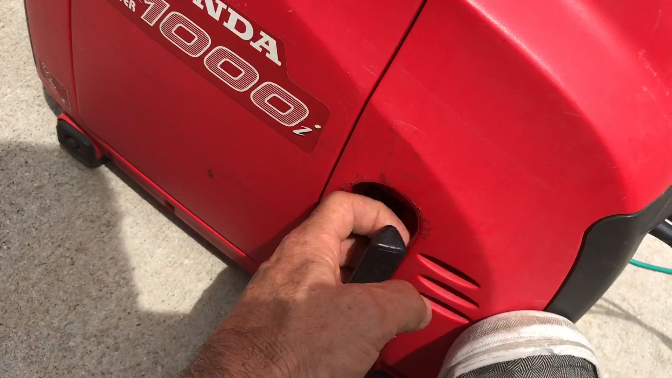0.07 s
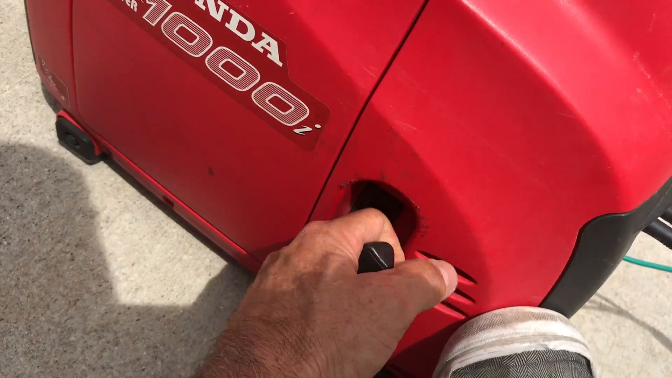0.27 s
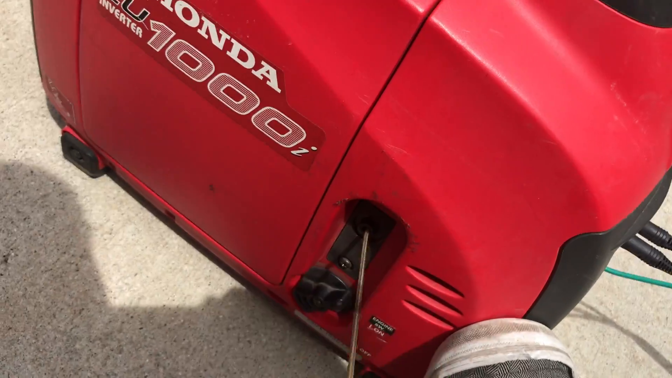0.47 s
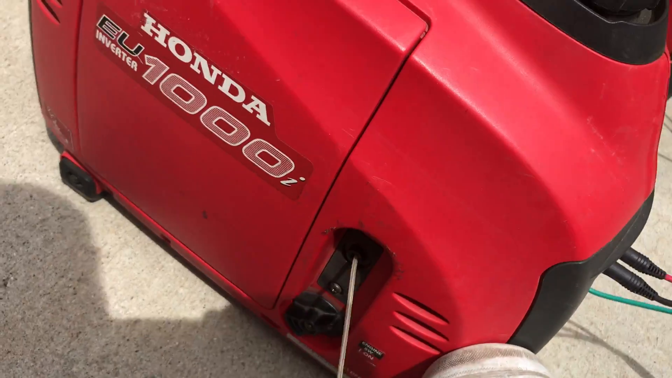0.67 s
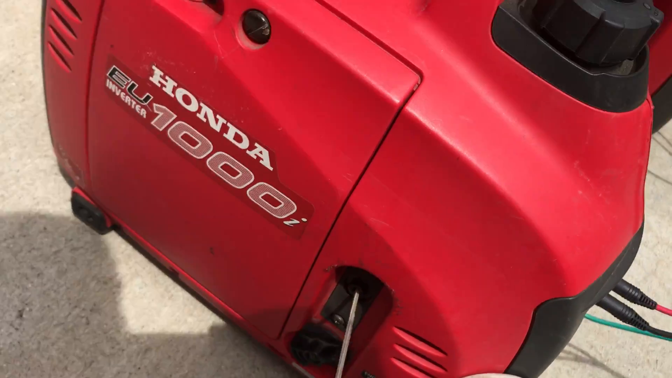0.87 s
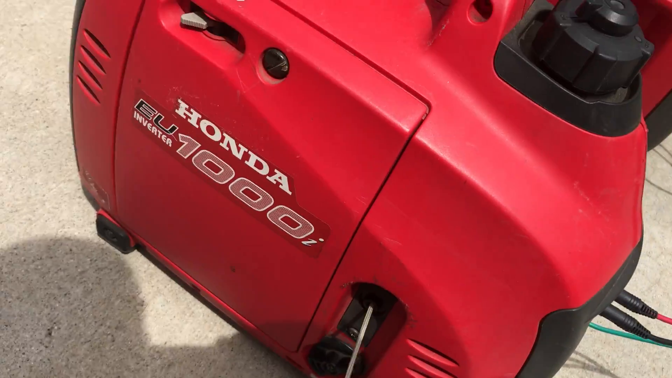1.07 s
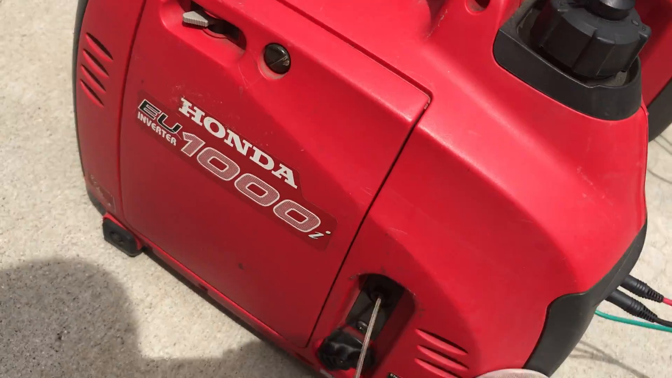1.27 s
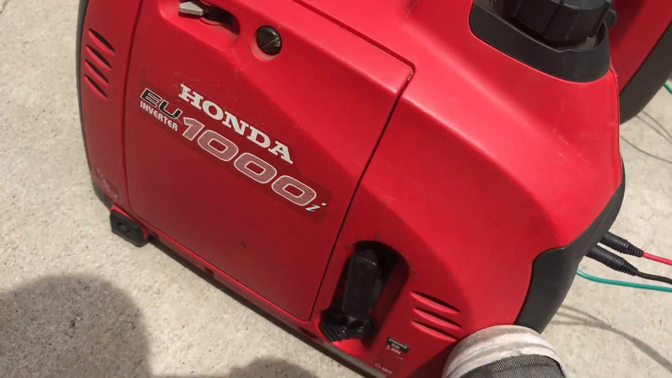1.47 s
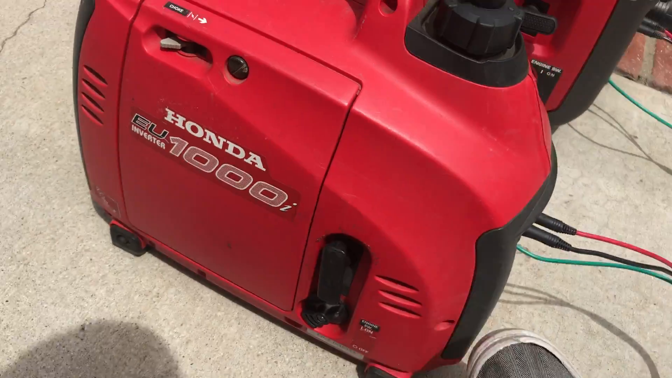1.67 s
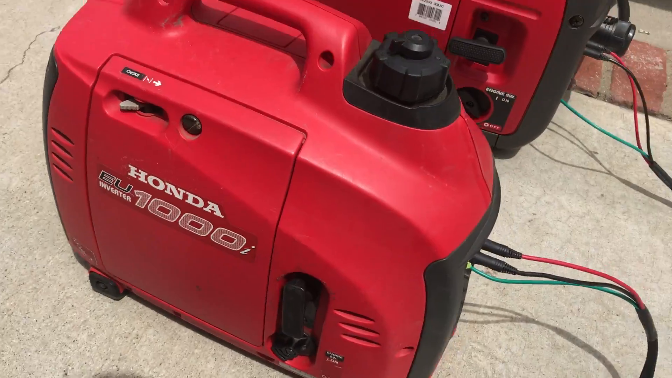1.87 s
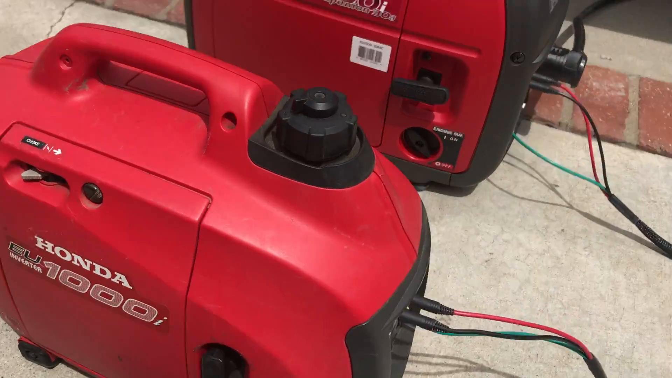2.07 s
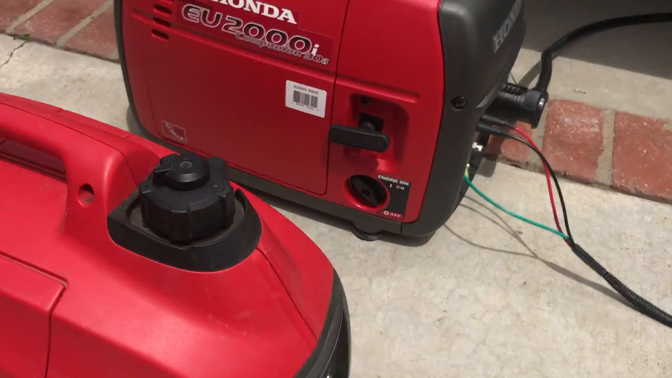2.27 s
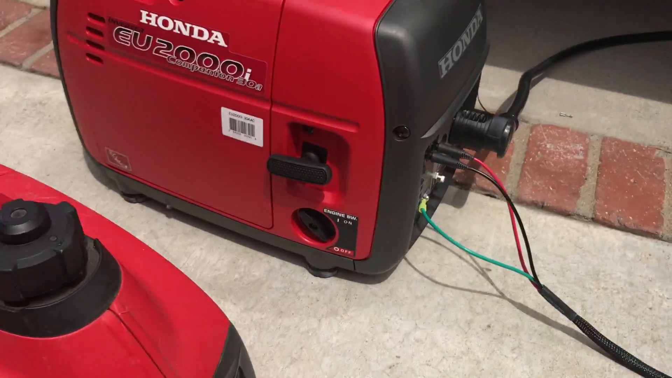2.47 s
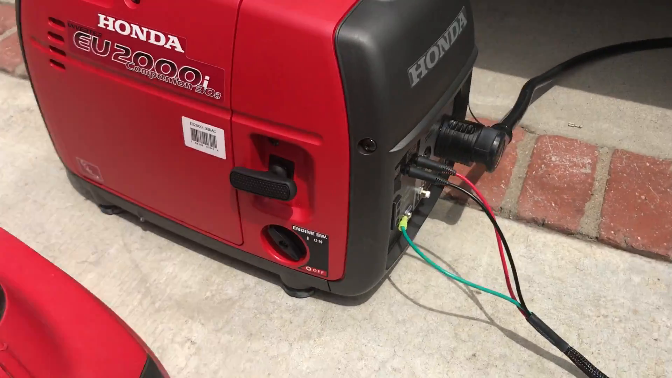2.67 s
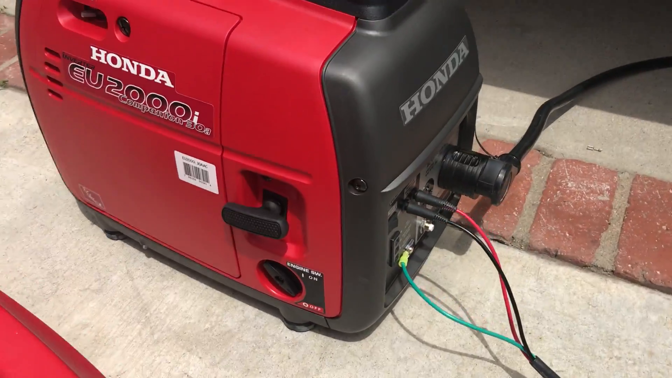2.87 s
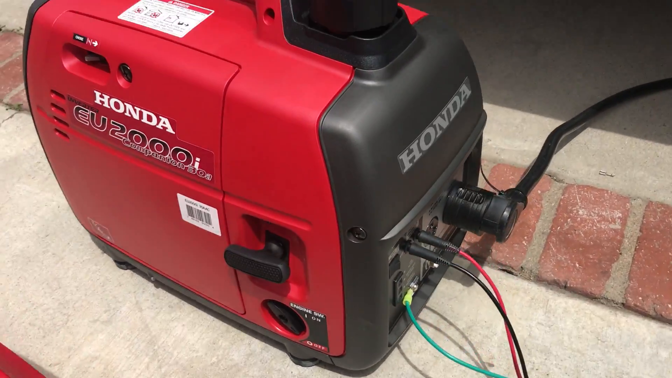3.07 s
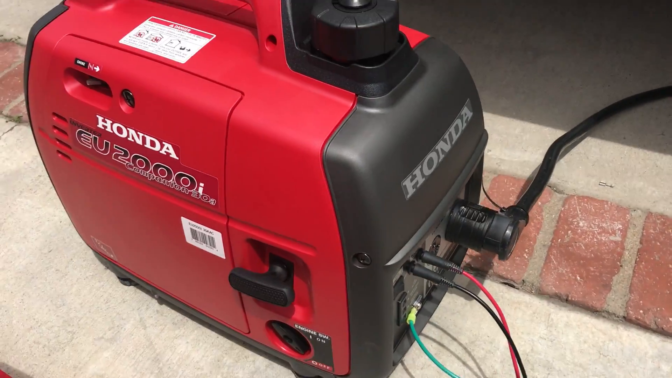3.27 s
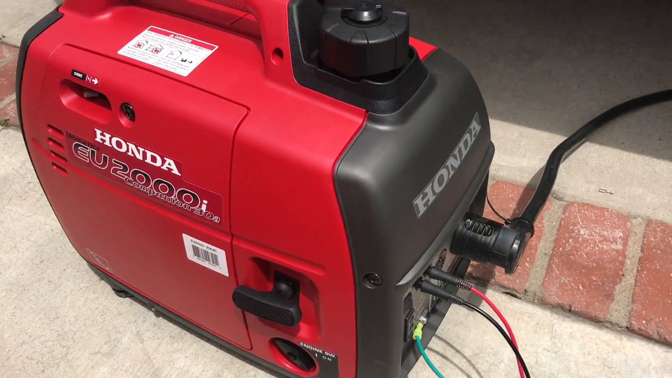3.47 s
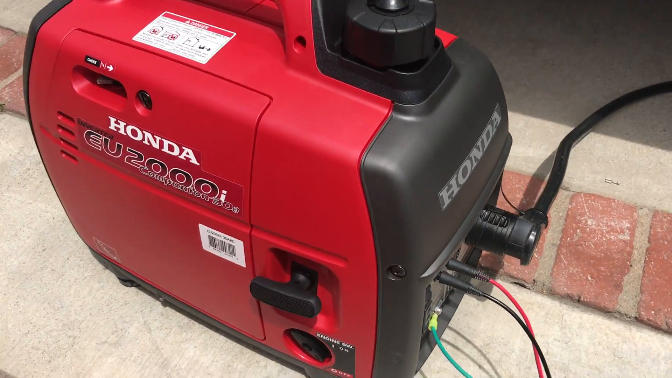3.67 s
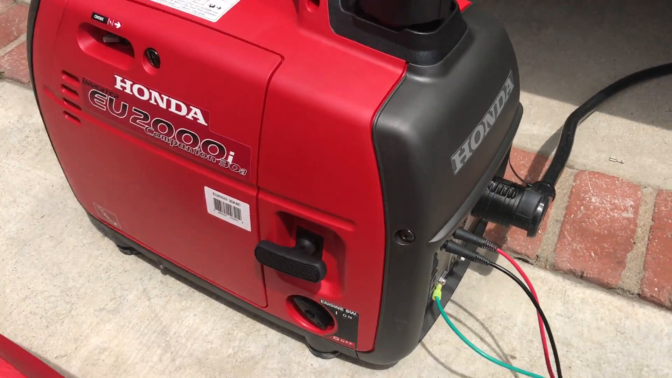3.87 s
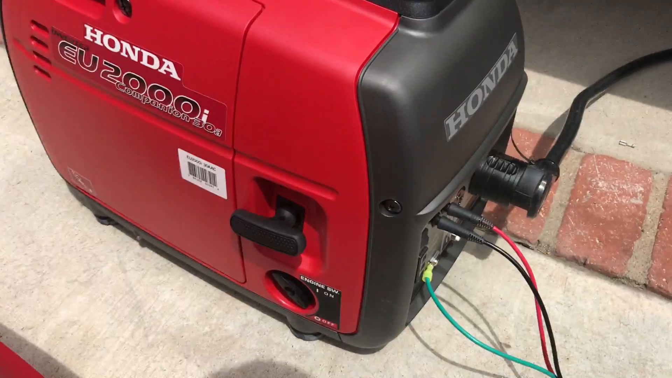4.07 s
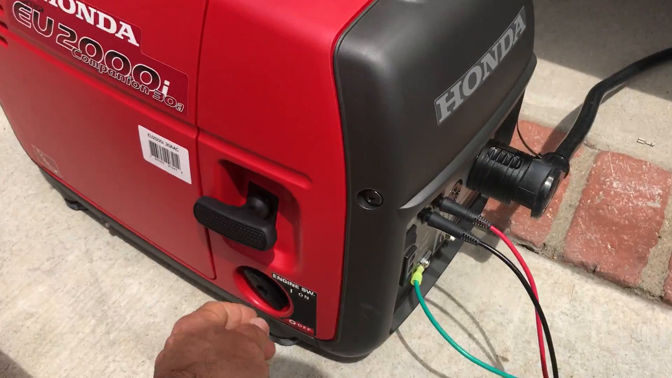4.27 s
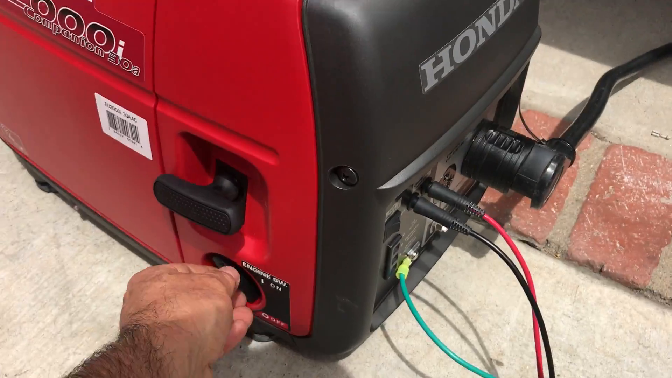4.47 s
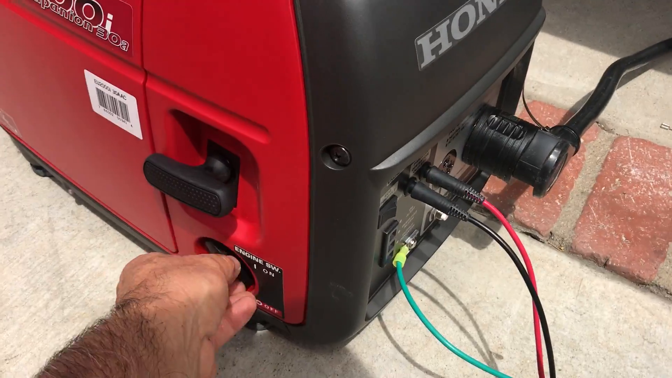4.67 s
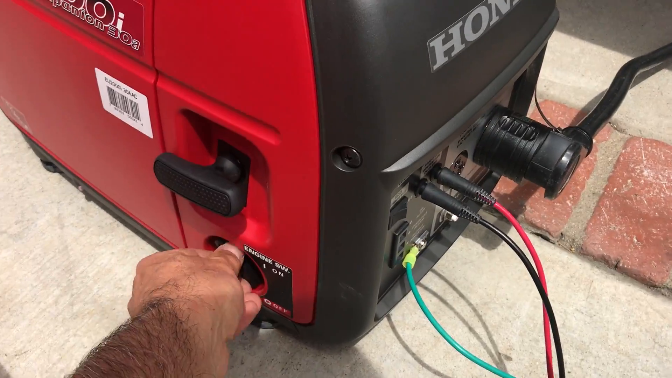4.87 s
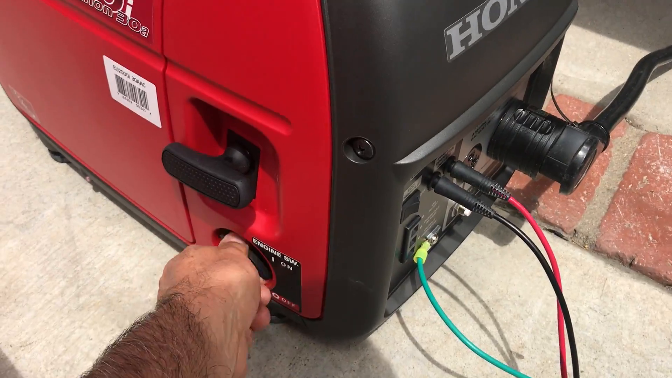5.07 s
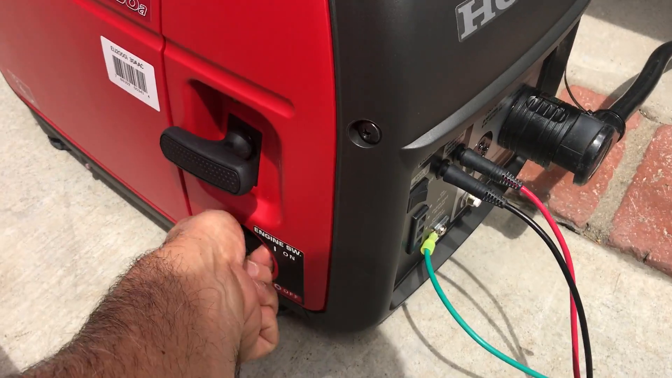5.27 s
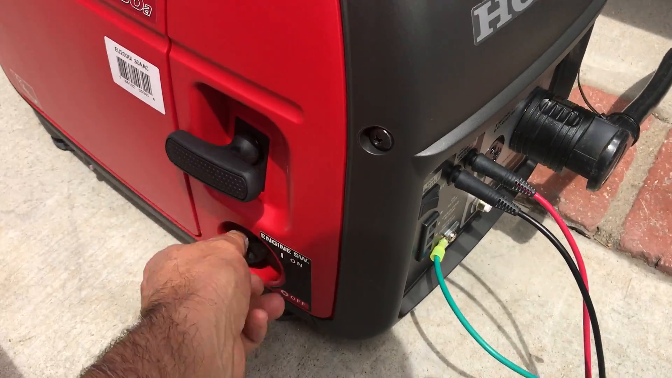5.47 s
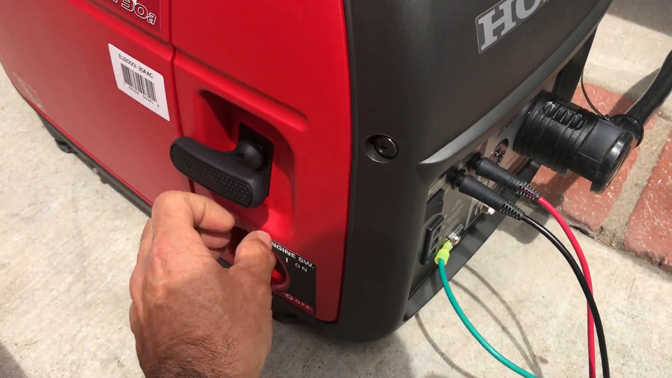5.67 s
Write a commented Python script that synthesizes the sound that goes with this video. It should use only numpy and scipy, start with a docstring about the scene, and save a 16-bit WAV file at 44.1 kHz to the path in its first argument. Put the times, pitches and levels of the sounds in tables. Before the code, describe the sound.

A small petrol generator is pull-started with a rope zip and a plastic slap, then settles into a steady, rattling drone.

```python
"""A concrete yard, where a small petrol inverter generator is pull-started close by.
The grip clicks, the reel scrapes, the rope zips out, the single four-stroke cylinder catches and the
grip slaps back on the plastic case. The engine overshoots, then settles to a governed exhaust drone
with knocking panels, valve clatter and a fan whine, over a low breeze and a faint outdoor hiss."""
import sys
import numpy as np
from scipy import signal
from scipy.fft import rfft, irfft
from scipy.io import wavfile

SR = 44100
rng = np.random.default_rng(int(sys.argv[2]) if len(sys.argv) > 2 else 0)


def inscribe(sig):
    """Save sig as 16-bit PCM at rate SR to the path in sys.argv[1].

    A 1-D sig is mono; a 2-D sig holds one channel per row.
    Samples are clipped to [-1, 1] before scaling.
    """
    pcm = np.round(np.clip(np.atleast_2d(sig).T, -1, 1) * 32767)
    wavfile.write(sys.argv[1], SR, pcm.astype(np.int16))


N = 252252
T = np.arange(N) / SR

# the rope is drawn, the engine catches, the throttle starts to close, the running settles
PULL_S, CATCH_S, GOVERN_S, SETTLE_S = 0.49, 0.959, 1.36, 1.95
RUNNING_HZ = 33.36  # governed engine cycles a second, two shaft turns each

# harmonics of the engine cycle, 12 for the exhaust, the rest for the case: order, relative_db
DRONE = [(1, -28), (2, -6), (3, -4), (4, 2), (5, -12), (6, -2), (7, -1), (8, -10.5), (9, -9.5), (10, -10.5),
         (11, -9), (12, -17), (13, -18.5), (14, -19), (15, -15), (16, -45.5), (17, -8.5), (18, -12.5),
         (19, -11.5), (20, -21), (21, -11.5), (22, -6), (23, -45.5), (24, -32), (25, -5), (26, -10.5),
         (27, -6.5), (28, -15), (29, -10), (30, -17.5), (31, -8), (32, -8), (33, -11.5), (34, -29.5),
         (35, -18), (36, -0.5), (37, -15.5), (38, -27), (39, -27), (40, -11)]
# resonances of the plastic panels: frequency_hz, relative_db
PANEL_COLOUR = [(240, -43.5), (400, -6), (436, -10.5), (580, -3), (662, -2), (717, -5), (776, -2),
                (916, -7), (1380, 0), (1650, -8.5), (1950, -17.5), (2540, -39), (4290, -120)]
# resonances of the metal cylinder head: frequency_hz, relative_db
HEAD_COLOUR = [(1750, -12), (1950, -11.5), (2040, -5), (2120, -4.5), (2290, 0.5), (2460, 4), (2540, -5),
               (2750, -11.5), (3050, -21), (3400, -22.5), (3800, -30.5)]


def engine():
    """One crankshaft keeps all the engine's voices in step."""
    cycle = np.cumsum(speed()) / SR
    # slow cranking mostly rustles; the parts knock as speed builds
    knocking = np.interp(T, [1.35, 1.7], [.15, .9])
    return (exhaust(cycle) + first_firings(cycle) + throb(cycle) + panels_and_head(cycle, knocking)
            + valves(cycle) + fan(cycle) + knocking * alternator(cycle))


def exhaust(cycle):
    """Muffled firings: ragged puffs of gas, joined by a clean low drone once the engine catches."""
    # boom of the muffler: frequency_hz, relative_db
    boom = [(60, -3), (110, -3.5), (170, -2.5), (240, -1.5), (330, -7), (420, -26.5)]
    puffs = unit(colour(noise() * (1 + 0.41 * np.cos(2 * np.pi * cycle)), boom))
    puffs *= drive_gain(-37.5, doubling_db=7, open_db=12.5, lean_db=2)
    drone = ramp(CATCH_S, .2) * hum(cycle, DRONE[:12], wander_db=2.5)
    drone *= drive_gain(-32.5, doubling_db=-1, open_db=7, lean_db=2.6)
    unsettled = 1 - ramp(SETTLE_S, 0.44)
    return undb(-5 * unsettled) * drone + puffs


def first_firings(cycle):
    """On open throttle every cycle bangs, harder with speed, ringing the head and, less, the panels."""
    # stray hard firings as the throttle closes: start_s, level_db
    stray_firings = [(1.444, -18.5), (1.589, -25), (1.726, -28.5)]
    times = np.interp(np.arange(int(cycle[-1])) + .45, cycle, T)  # fires 45% into the cycle
    times = times[(times > CATCH_S) & (times < GOVERN_S + .015)]
    levels_db = -17 + 3.5 * np.log2(np.interp(times, T, speed()) / RUNNING_HZ)
    bangs, attack = np.zeros(N), 1 - fade(.012)
    for start_s, level_db in stray_firings + list(zip(times, levels_db)):
        add(bangs, start_s, undb(level_db) * attack * burst(0.058))
    return undb(2) * colour(bangs, HEAD_COLOUR) + undb(-1.5) * colour(bangs, PANEL_COLOUR)


def throb(cycle):
    """Until it settles, the piston shakes the case at shaft rate and double, sweeping through its boom."""
    boom_hz, out = 79.6, 0
    for order, base_db, open_db in [(2, -35, 10.5), (4, -45.5, 20.5)]:
        off_boom_db = -9 * np.log2(order * speed() / boom_hz) ** 2
        gain = undb(base_db + open_db * throttle() + off_boom_db)
        out += gain * np.sqrt(2) * np.sin(2 * np.pi * order * cycle)
    return out * ramp(CATCH_S, 0.51) * (1 - ramp(SETTLE_S + 0.23, 0.31)) * coast()


def panels_and_head(cycle, knocking):
    """Knocks rattle the plastic panels loosely and the metal head tightly; high orders buzz the case."""
    rustle = np.sqrt(1 - knocking ** 2)
    loose = clatter(cycle, t60=0.026, slop_s=0.00025, scatter_db=2.5)
    loose = colour(loose, [(450, -7.5), (900, -2.5), (1150, -1.5), (2000, 1.0)])
    panels = knocking * unit(colour(loose, PANEL_COLOUR)) + rustle * unit(colour(noise(), PANEL_COLOUR))
    panels += undb(-2) * knocking * hum(cycle, DRONE[12:], wander_db=1.5)
    panels *= drive_gain(-34.5, doubling_db=5.5, open_db=4, lean_db=0.5)
    tight = clatter(cycle, t60=0.019, slop_s=.00004, scatter_db=1.83)
    head = knocking * unit(colour(tight, HEAD_COLOUR)) + rustle * unit(colour(noise(), HEAD_COLOUR))
    head *= drive_gain(-34.5, doubling_db=4.5, open_db=1.5, lean_db=1.15)
    return panels + head


def clatter(cycle, t60, slop_s, scatter_db):
    """Each knock returns at its own crank angle with its own ring, never quite alike."""
    # valve gear and piston knocks: cycle_fraction, relative_db
    knocks = [(.07, -7), (0.199, -3), (0.349, -2), (0.461, -9.5), (0.602, -14), (.66, -6), (.77, -1),
              (0.878, -2.5), (0.969, -6.5)]
    out, cycles = np.zeros(N), np.arange(int(cycle[-1]) + 1)
    for fraction, level_db in knocks:
        timing, force = rng.standard_normal((2, len(cycles)))
        times = np.interp(cycles + fraction, cycle, T) + slop_s * timing
        gains = undb(level_db + scatter_db * force) * (cycles + fraction < cycle[-1])
        blows = np.bincount(np.maximum(times * SR, 0).astype(int), gains, N)[:N]
        out += signal.fftconvolve(blows, burst(t60))[:N]
    return unit(out)


def fan(cycle):
    """A shaft-locked whine and air howling in the vents; both swell as the listener drifts past."""
    angle = 2 * np.pi * cycle
    flow = (speed() / RUNNING_HZ) ** 3 * coast()
    whine = undb(-32.5 + 2.5 * walk(15)) * np.sin(42 * angle + .25 * walk(12))
    whine *= 1 + .6 * np.sin(angle)  # pulses once a cycle
    air = clatter(cycle, t60=0.027, slop_s=.0001, scatter_db=-0.5) + undb(-7.5) * noise()
    howl = undb(-35) * unit(colour(air, [(1100, -24), (1235, -0.5), (1320, 1), (1480, -15.5)]))
    # air rushing from the vents: frequency_hz, relative_db
    rush_colour = [(2400, -7.5), (2650, 5), (3050, -3.5), (3500, -12.5)]
    rush = undb(-45.5) * unit(colour(air + noise(), rush_colour))
    pass_s, whine_reach_s, vent_reach_s = 2.61, 1.08, 0.38
    whine_distance = np.hypot(1, (T - pass_s) / whine_reach_s)
    vent_distance = np.hypot(1, (T - pass_s) / vent_reach_s)
    return flow * (whine / whine_distance + (howl + rush) / vent_distance)


def alternator(cycle):
    """The alternator whines thinly on high multiples of the engine cycle."""
    # partials of the whine: order, relative_db
    partials = [(61, -2.5), (68, 3.5), (73, -2.5), (102, -24.5), (129, -25), (144, -24), (163, -35.5)]
    gain = drive_gain(-39.5, doubling_db=7.5, open_db=-4, lean_db=4.5)
    return gain * hum(cycle, partials, wander_db=3.5)


def valves(cycle):
    """Gas hisses past the valve as it lifts, once a cycle; the cam drive whirrs and the gear rings."""
    # hiss at the valve: frequency_hz, relative_db
    gas_colour = [(1940, -34), (3300, 4.5), (3970, -14), (4270, 2), (4900, -1.5), (5100, -2.5),
                  (5560, -1.5), (6020, -8), (6870, -13.5), (7540, -16), (8380, -13), (10600, -27),
                  (13600, -23.5), (16000, -38.5)]
    since_lift = (cycle - .58) % 1
    lift = .32 + (1 - np.exp(-since_lift / .04)) * np.exp(-since_lift / .36)
    ticks = np.interp(T, [1, 1.6], [.3, 1]) * clatter(cycle, t60=.06, slop_s=.000006, scatter_db=1)
    spurts = unit(lift * (noise() + undb(-4) * ticks))
    whirr = undb(-4) * unit(colour(ticks, [(3400, 2.0), (4300, 5), (5400, -2.0), (5900, -16.0)]))
    ring = undb(-21) * unit(colour(spurts, [(7800, -31.5), (8230, 12.5), (8370, -5), (8800, -23.5)]))
    gas = unit(colour(spurts, gas_colour))
    gas = colour(gas, [(3000, -5.0), (6300, -2.5), (8500, 0.0), (16000, -0.5)])
    return drive_gain(-56.5, doubling_db=10.5, open_db=6.5, lean_db=0.6) * (gas + whirr + ring)


def speed():
    """Engine cycles a second: the run-up, then the governor's slow hunting."""
    # the pull, the catch and the overshoot, last speed held: time_s, cycle_hz
    run_up = [(.55, 4), (.75, 11), (1.0, 15), (1.1, 19.5), (1.2, 26), (1.3, 31.24), (1.55, 35.01),
              (1.8, 36.9), (2.13, 33.36)]
    times, cycle_hz = np.transpose(run_up)
    depth_hz, period_s, peak_s = .17, 1.07, 3.26
    hunting = depth_hz * np.cos(2 * np.pi * (T - peak_s) / period_s)
    return np.interp(T, times, cycle_hz) + hunting * (T > times[-1])


def throttle():
    """Wide open (1) for the start, then closing to its running position (0)."""
    return np.exp(-np.maximum(T - GOVERN_S, 0) / 0.18)


def coast():
    """A dip in gain as the engine coasts for a moment in the overshoot."""
    return undb(-6.5 * bump(1.65, 0.068))


def drive_gain(running_db, doubling_db, open_db, lean_db):
    """A part's gain follows doublings of speed, the open throttle and the listener leaning in late on."""
    load_db = doubling_db * np.log2(speed() / RUNNING_HZ) + open_db * throttle()
    at_rest_db = -30 * (1 - ramp(PULL_S - .05, 0.3))
    heave_db = 1.5 * bump(0.633, 0.02)  # the piston's first compression
    return undb(running_db + load_db + at_rest_db + heave_db + lean_db * ramp(4.51, 0.16)) * coast()


def grip():
    """Each blow of the starter grip rings the case modes and the dense shell, with a crack on top."""
    # grip and rope knocking on the case: start_s, level_db, crack_relative_db
    blows = [(.119, -27, -42), (0.274, -39.5, -9), (0.28, -26, -17), (.284, -25.5, -18), (.997, -27.5, -2),
             (1.028, -27.5, -0.5), (1.478, -7.5, -21), (1.484, -12.5, -26), (1.4919, -6.5, -10.5),
             (1.5, -7.5, -21), (1.5097, -11.5, -26), (1.514, -20, -7), (1.533, -18, -13)]
    # modes of the plastic case: pitch_hz, relative_db, ring_time_ratio
    case_modes = [(187.6, -15.5, 5.9), (264, -4, 0.65), (360, -17, 0.66), (633, -5, 0.48),
                  (910, -0.5, 0.31), (957, -5, 1.3), (1263, 3, 0.34), (1375, 0.5, 1.05), (1506, -0.5, 1.1),
                  (1590, -3.5, 0.61), (2104, -1, 0.54), (2295, -5, 0.64), (2550, -28, 0.43),
                  (3260, -15.5, 0.93)]
    ring_s, even_blow_db = 0.051, -11.5
    modes, shell, crack = np.zeros((3, N))
    for start_s, level_db, crack_db in blows:
        # hard blows ring brighter; the fingers cushion gentle ones into a slower attack
        tilt_db = 0.57 * (level_db - even_blow_db)
        attack = 1 - fade(.0018 * 2 ** ((even_blow_db - level_db) / 6))
        for pitch_hz, mode_db, ring_ratio in case_modes:
            polarity, detune = rng.choice([-1, 1]), 1 + 0.005 * rng.standard_normal()
            gain = undb(level_db + mode_db + tilt_db * np.log2(max(pitch_hz, 700) / 1300))
            tone = polarity * np.sin(2 * np.pi * pitch_hz * detune * T[:N // 20])
            add(modes, start_s, gain * attack * fade(ring_s * ring_ratio) * tone)
        add(shell, start_s, undb(level_db) * attack * burst(ring_s))
        add(crack, start_s, undb(level_db + crack_db) * attack * burst(0.039))
    shell = colour(shell, [(700, -11), (1300, 11.0), (1800, -12), (2400, 9.5), (3600, -22.0),
                           (6000, -29.5), (15000, -71)])
    crack = colour(crack, [(2000, 17.5), (5000, 1.5), (9000, -10.0), (16000, -20)])
    return undb(-5.5) * modes + undb(-1.5) * shell + crack


def rope():
    """The braid ticks over its guide so fast that it sings raspily; each zip curves up in pitch."""
    # zips of the rope: start_s, length_s, first_hz, last_hz, level_db
    zips = [(0.72, 0.19, 1390, 2123, -36), (0.889, 0.09, 965, 1037, -32.5), (0.958, 0.1, 1290, 1410, -28.5)]
    out, edge_s = np.zeros(N), 0.0083
    for start_s, length_s, first_hz, last_hz, level_db in zips:
        pitch_hz = first_hz + (last_hz - first_hz) * np.clip((T - start_s) / length_s, 0, 1) ** 1.7
        envelope = np.clip(np.minimum(T - start_s, start_s + length_s - T) / edge_s, 0, 1)
        angle = 2 * np.pi * np.cumsum(pitch_hz * (1 + 0.043 * walk(250))) / SR
        overtone = undb(-14) * np.interp(pitch_hz, [1500, 1800], [1, .1])  # the case muffles it above 3 kHz
        out += envelope * undb(level_db + 3.1 * walk(90)) * (np.sin(angle) + overtone * np.sin(2 * angle))
    return out


def reel():
    """The starter reel scrapes in fits, harder through the pull, and fades out after the catch."""
    # scrape of the reel: frequency_hz, relative_db
    scrape_colour = [(2150, -5), (2500, 4.5), (2950, 3), (3300, -13.5), (4500, -16), (6000, -26.5),
                     (10000, -35)]
    pull = np.clip((T - PULL_S) / (CATCH_S - PULL_S), 0, 1)
    gain = undb(-60 + 21 * pull + 4.5 * walk(12)) * (1 - ramp(CATCH_S + 0.33, 0.31))
    return gain * unit(colour(noise(), scrape_colour))


def yard():
    """Breeze rumbles on the microphone, with one lull, over a faint outdoor hiss."""
    # open-air background: frequency_hz, relative_db
    air_colour = [(120, 1.5), (300, -5.5), (450, -11), (700, -5), (950, -13.5), (1300, -6), (1800, -21.5),
                  (2400, -1), (3000, -26), (3600, -36.5), (4500, -34.5), (7000, -53), (16000, -43.5)]
    rumble = unit(colour(noise(), [(25, -12), (42, -6.5), (58, 1.0), (75, -5.5), (110, -9), (220, -30)]))
    hiss = undb(-49 + walk(2.1)) * unit(colour(noise(), air_colour))
    lull = bump(3.8, 0.65)
    return undb(-39 - 12 * lull) * rumble + hiss


def whistle(pitch_hz, level_db):
    """A thin, faint whistle high in the background."""
    return undb(level_db) * np.sin(2 * np.pi * np.cumsum(pitch_hz * (1 + .012 * walk(160))) / SR)


def hum(cycle, partials, wander_db):
    """Partials locked to the engine cycle, each swelling and fading a little."""
    angle = 2 * np.pi * (cycle + .0018 * walk(16))
    return unit(sum(undb(db + wander_db * walk(1.5)) * np.sin(order * angle + rng.uniform(0, 2 * np.pi))
                    for order, db in partials))


def colour(x, points):
    """Causal filter of unit power gain, shaped by (frequency_hz, relative_db) points."""
    hz, db = np.transpose(points)
    log_hz = np.log(np.fft.rfftfreq(N, 1 / SR) + 1)
    skirts_db = 60 * (np.maximum(np.log(hz[0]) - log_hz, 0) + np.maximum(log_hz - np.log(hz[-1]), 0))
    gain = unit(undb(np.maximum(np.interp(log_hz, np.log(hz), db) - skirts_db, -100)))
    # minimum phase keeps the attacks sharp
    cepstrum = irfft(np.log(gain), N)
    cepstrum[1:N // 2] *= 2
    cepstrum[N // 2 + 1:] = 0
    return signal.fftconvolve(x, irfft(np.exp(rfft(cepstrum)), N)[:N // 20])[:N]


def undb(db):
    """Decibels to gain."""
    return 10 ** (np.asarray(db) / 20)


def unit(x):
    """Scale to rms 1."""
    return x / np.sqrt(np.mean(x ** 2))


def noise():
    """White noise."""
    return rng.standard_normal(N)


def walk(rate_hz):
    """Smooth random drift of rms 1, changing about rate_hz times a second."""
    return unit(irfft(rfft(noise()) / (1 + (np.fft.rfftfreq(N, 1 / SR) / rate_hz) ** 4), N))


def fade(t60):
    """Envelope of a ring that dies by 60 dB in t60 seconds."""
    return np.exp(-np.log(1000) * T[:N // 20] / t60)


def burst(t60):
    """Dense ringing of a struck part."""
    return fade(t60) * rng.standard_normal(N // 20)


def ramp(centre_s, length_s):
    """A straight rise from 0 to 1."""
    return np.clip(.5 + (T - centre_s) / length_s, 0, 1)


def bump(centre_s, width_s):
    """A bell curve of height 1."""
    return np.exp(-((T - centre_s) / width_s) ** 2)


def add(out, start_s, sound):
    """Mix a sound in at start_s."""
    i = int(start_s * SR)
    out[i:i + len(sound)] += sound[:N - i]


def scene():
    """Engine, starter and yard in mono, a step away in the open air."""
    starter = grip() + rope() + reel()
    return (engine() + starter + yard() + whistle(pitch_hz=8150, level_db=-82.5))[None]


def record(dry):
    """Soft saturation rounds the loudest peaks and a steep low-pass cuts the top."""
    ceiling, top_hz = .72, 15900
    rounded = dry / (1 + (dry / ceiling) ** 4) ** (1 / 4)
    return signal.sosfilt(signal.ellip(8, .2, 70, top_hz, fs=SR, output="sos"), rounded)


dry = scene()
out = record(dry)
inscribe(out)
```